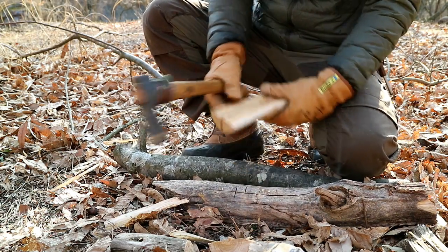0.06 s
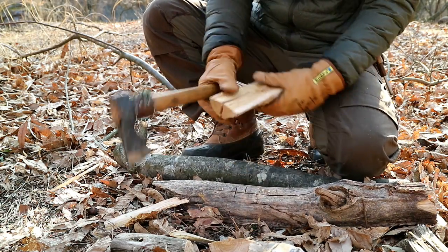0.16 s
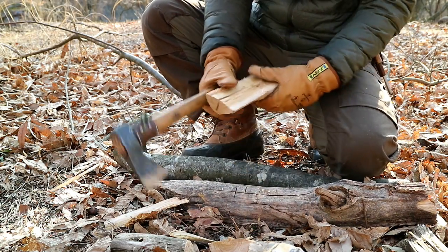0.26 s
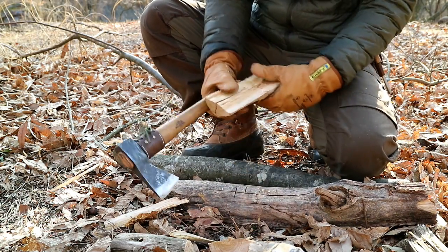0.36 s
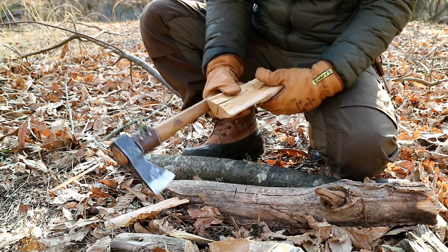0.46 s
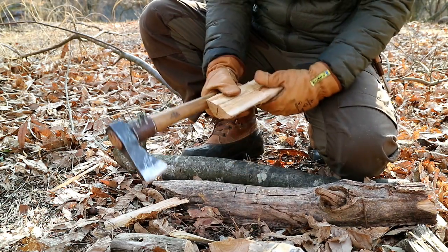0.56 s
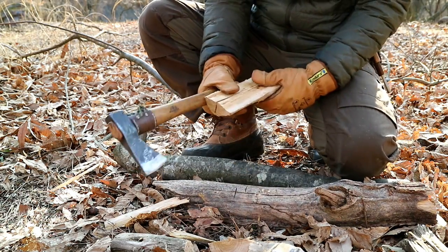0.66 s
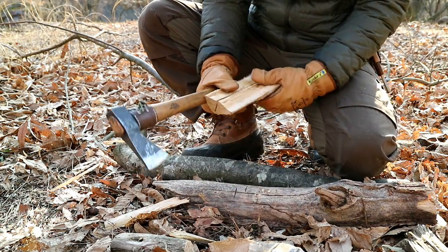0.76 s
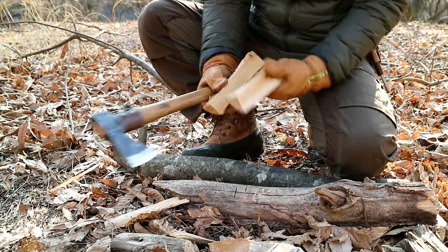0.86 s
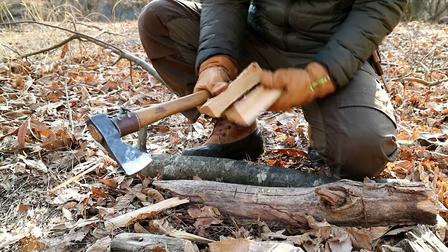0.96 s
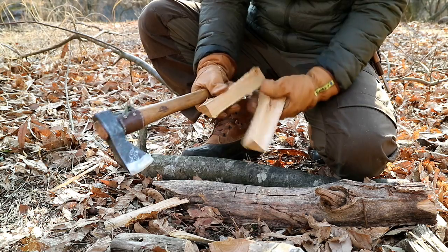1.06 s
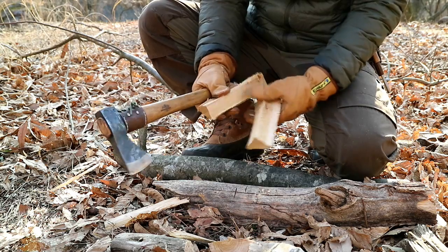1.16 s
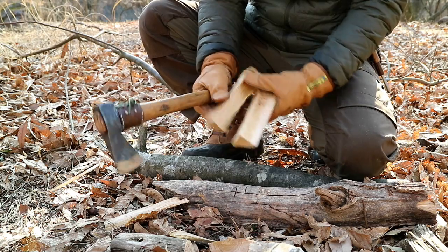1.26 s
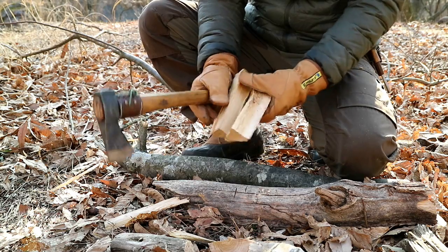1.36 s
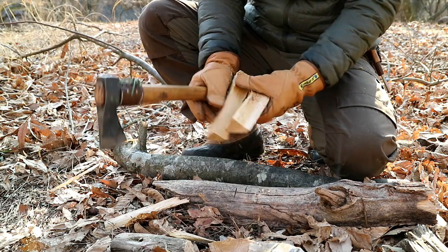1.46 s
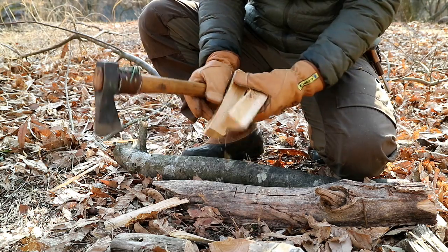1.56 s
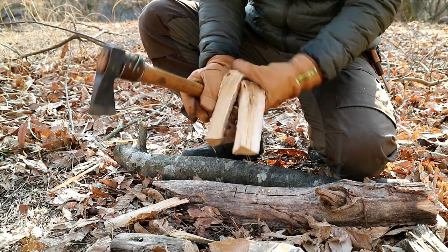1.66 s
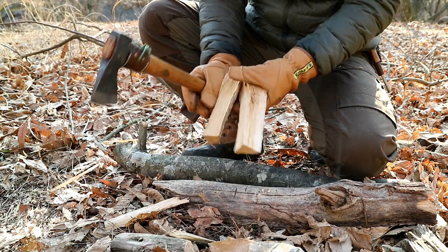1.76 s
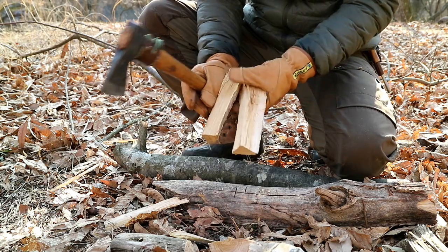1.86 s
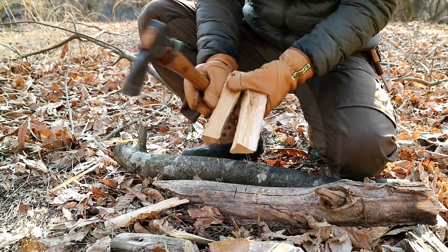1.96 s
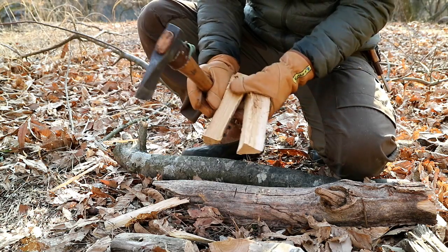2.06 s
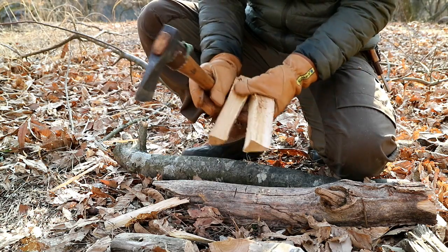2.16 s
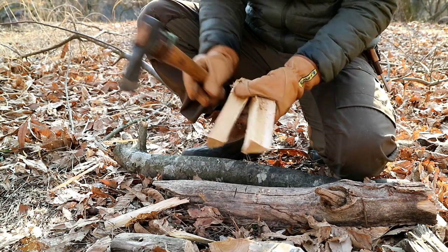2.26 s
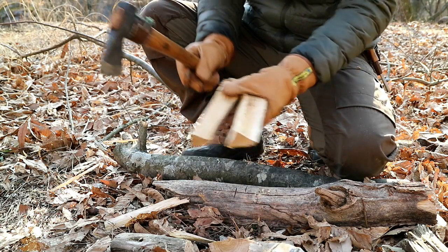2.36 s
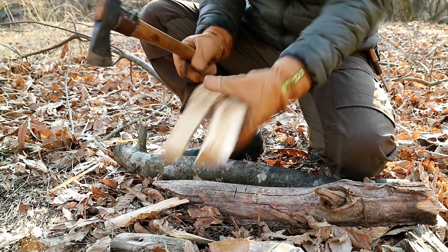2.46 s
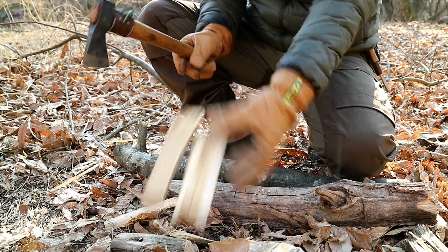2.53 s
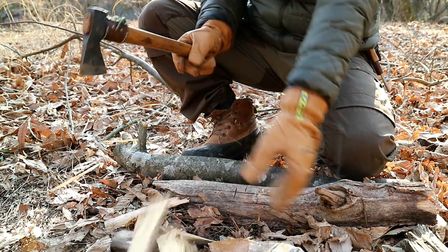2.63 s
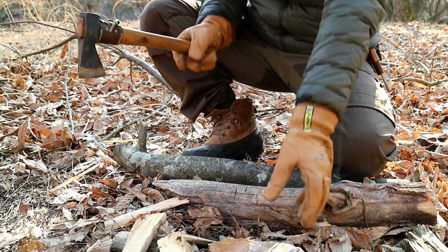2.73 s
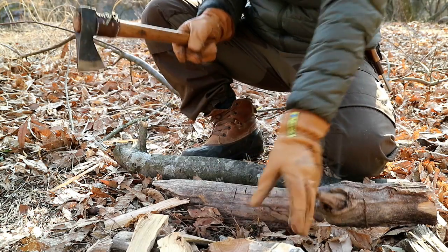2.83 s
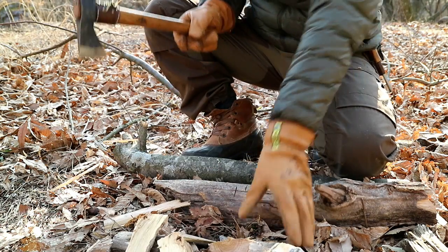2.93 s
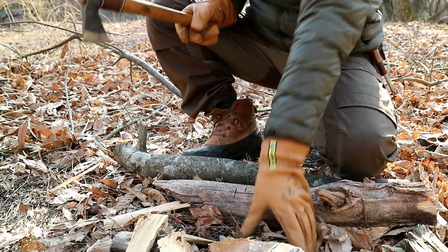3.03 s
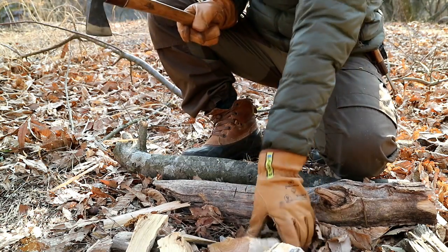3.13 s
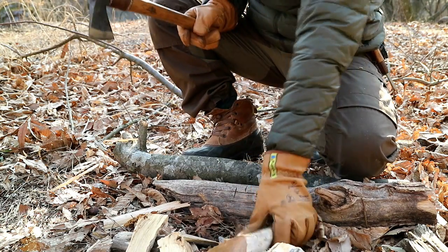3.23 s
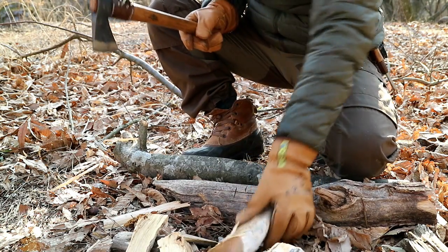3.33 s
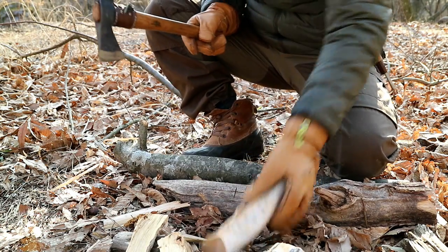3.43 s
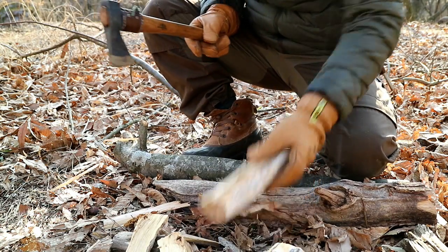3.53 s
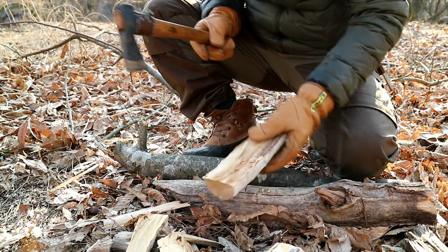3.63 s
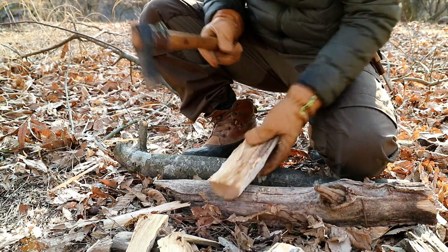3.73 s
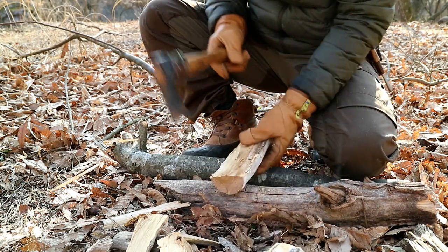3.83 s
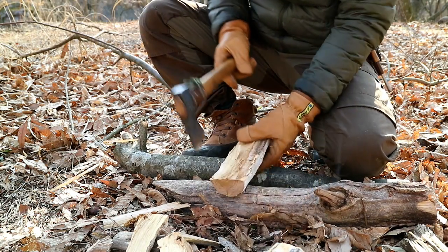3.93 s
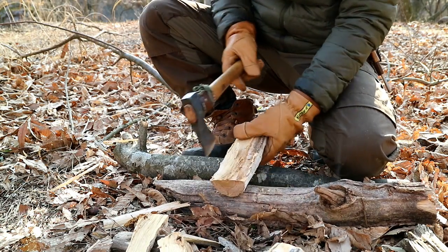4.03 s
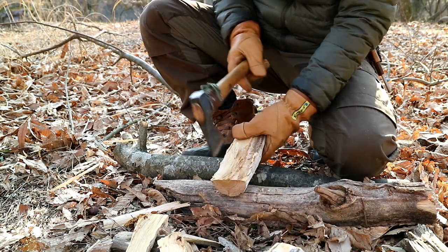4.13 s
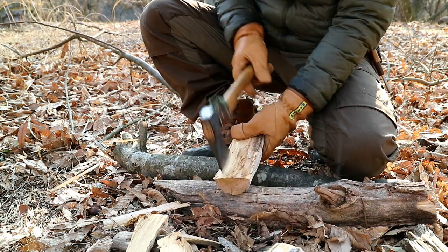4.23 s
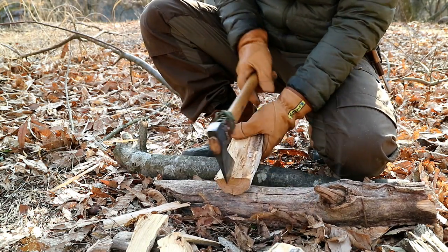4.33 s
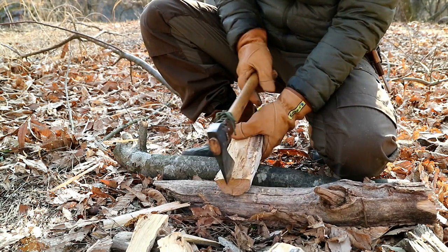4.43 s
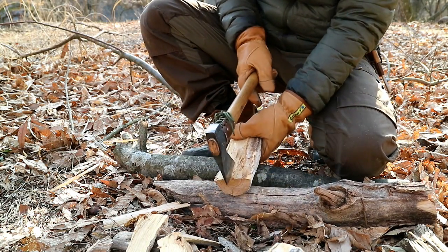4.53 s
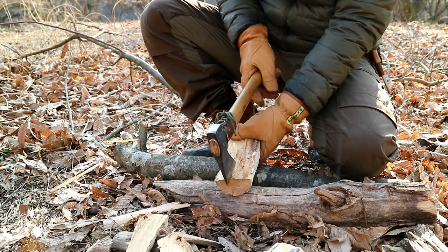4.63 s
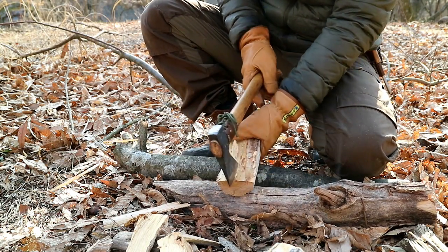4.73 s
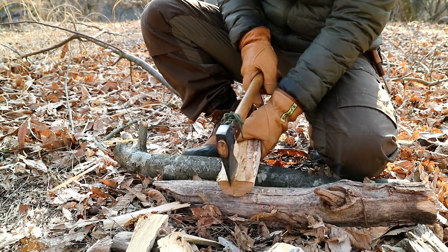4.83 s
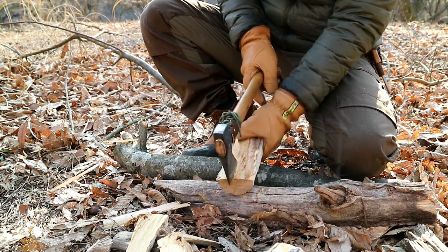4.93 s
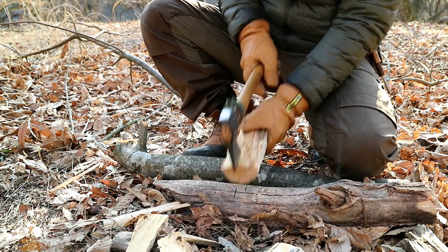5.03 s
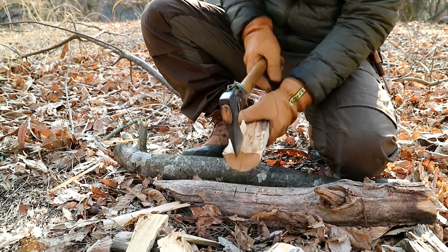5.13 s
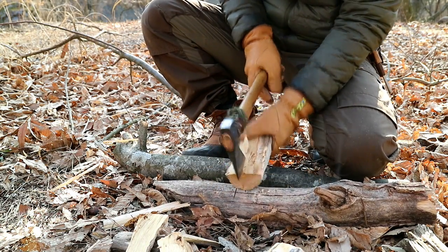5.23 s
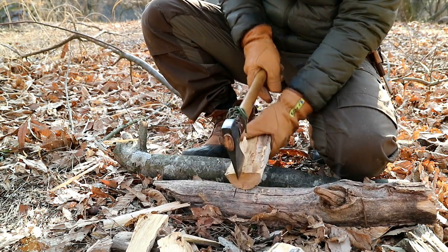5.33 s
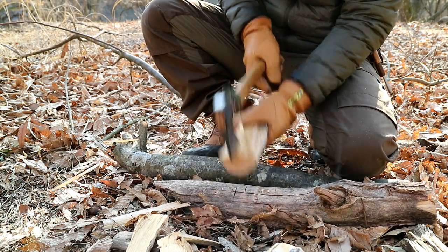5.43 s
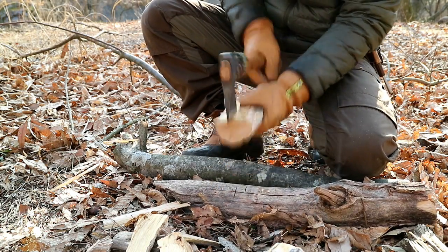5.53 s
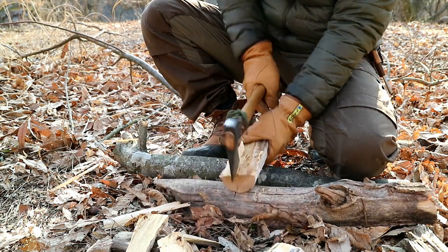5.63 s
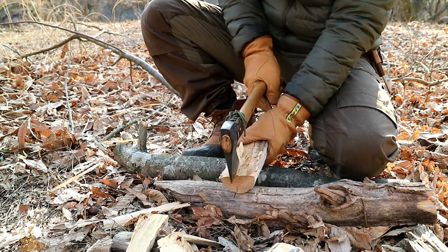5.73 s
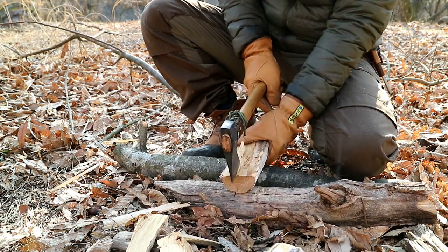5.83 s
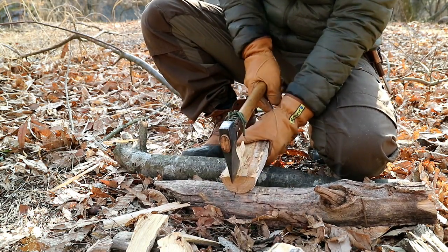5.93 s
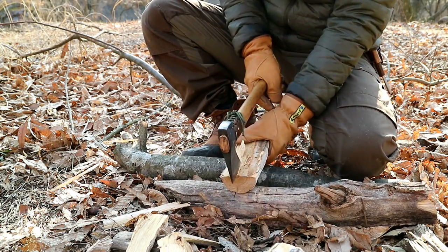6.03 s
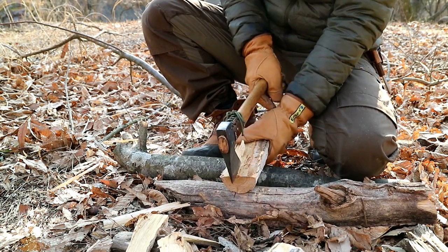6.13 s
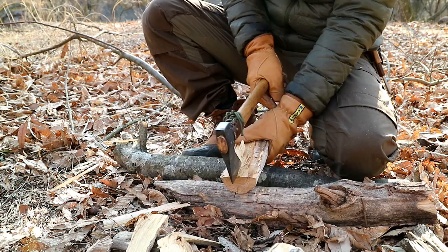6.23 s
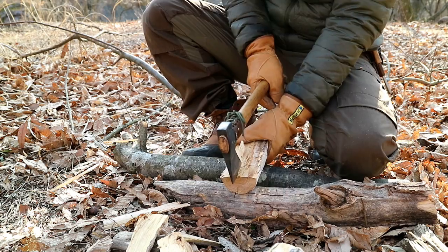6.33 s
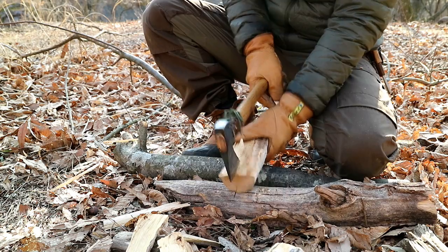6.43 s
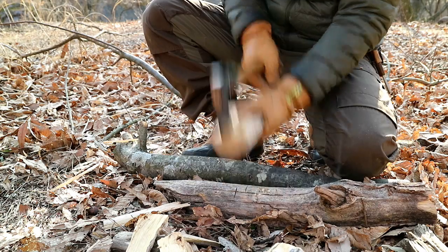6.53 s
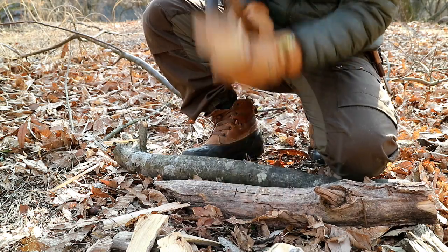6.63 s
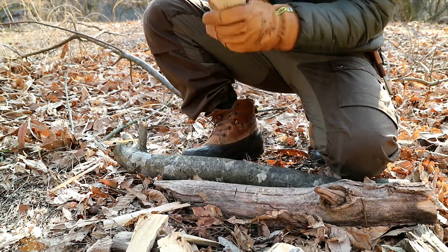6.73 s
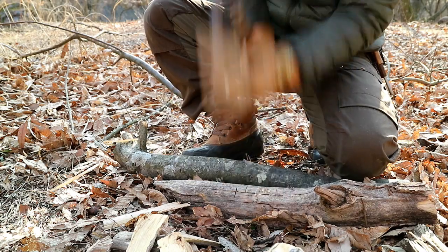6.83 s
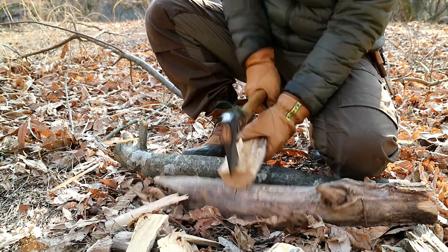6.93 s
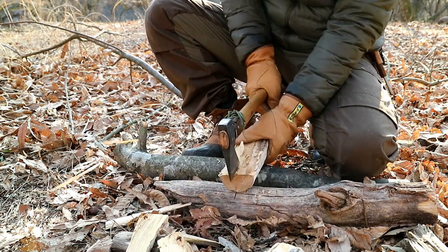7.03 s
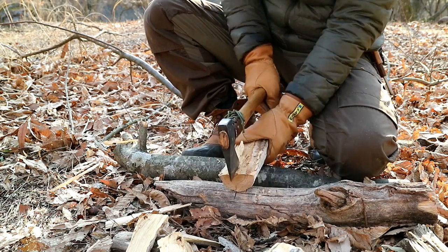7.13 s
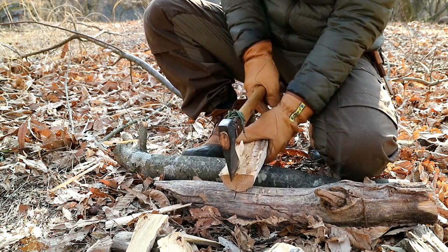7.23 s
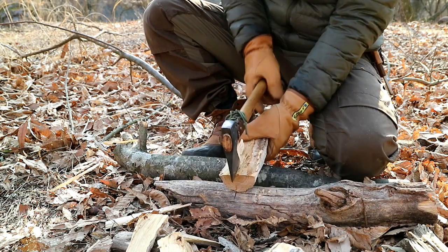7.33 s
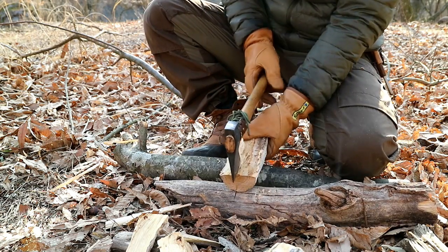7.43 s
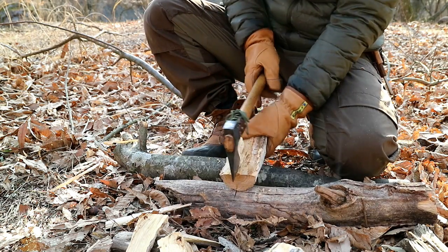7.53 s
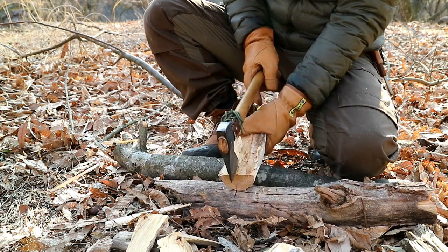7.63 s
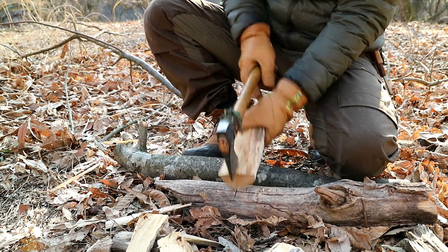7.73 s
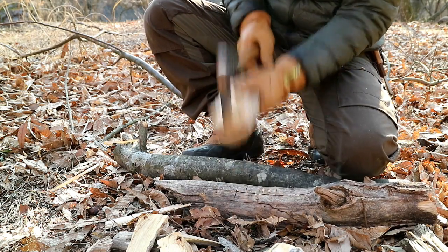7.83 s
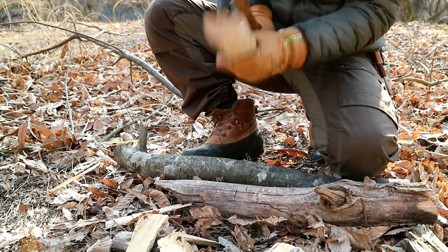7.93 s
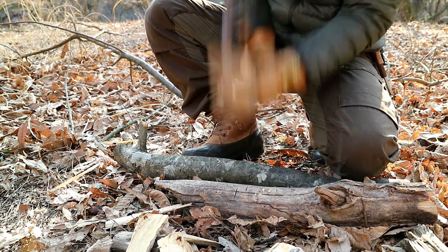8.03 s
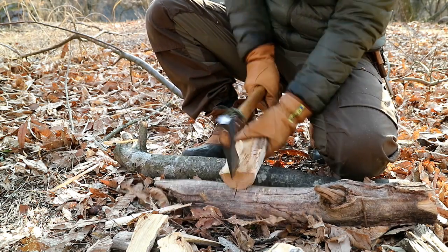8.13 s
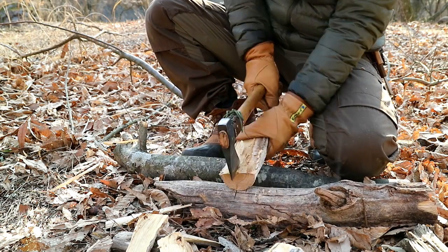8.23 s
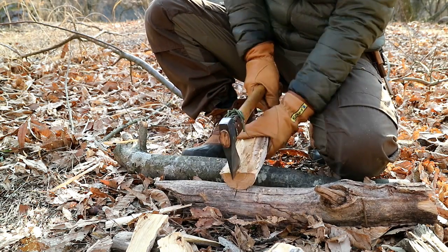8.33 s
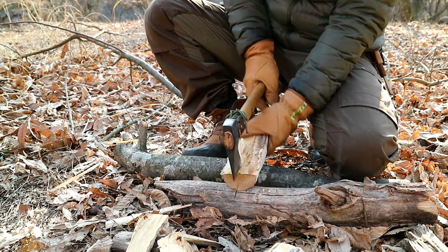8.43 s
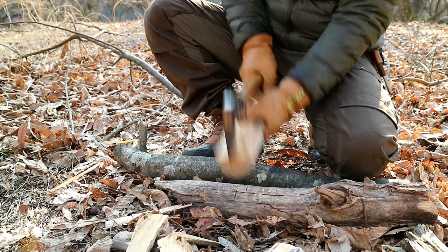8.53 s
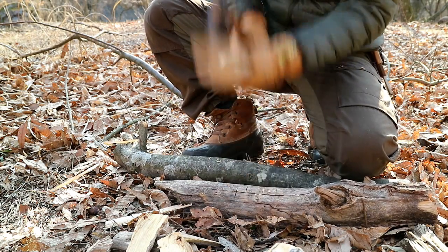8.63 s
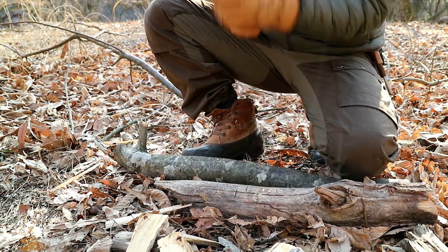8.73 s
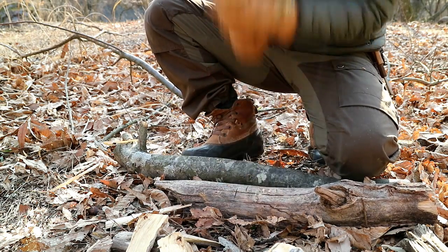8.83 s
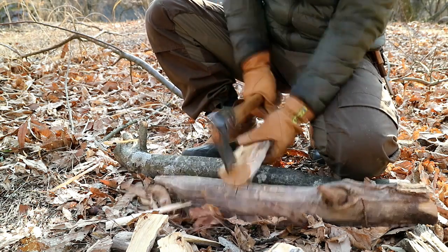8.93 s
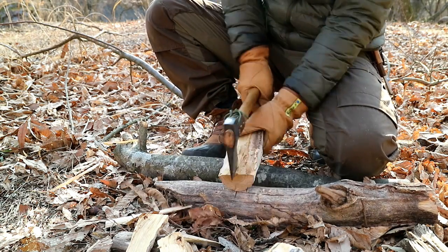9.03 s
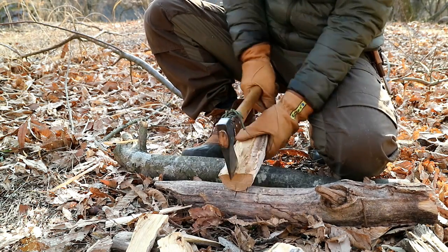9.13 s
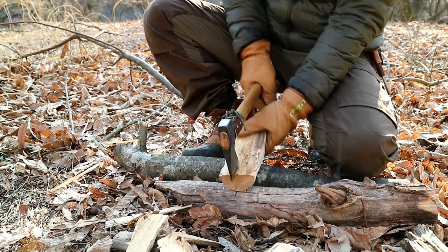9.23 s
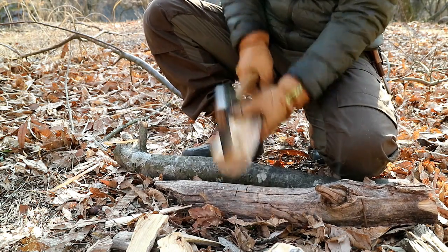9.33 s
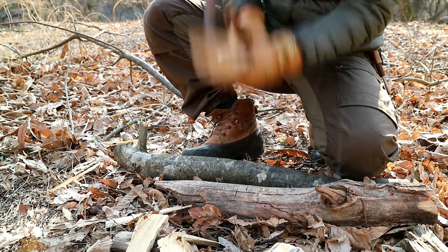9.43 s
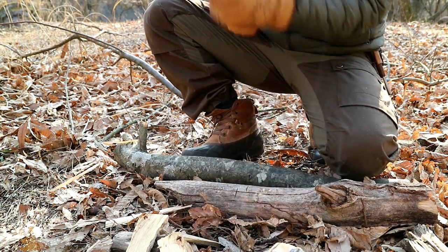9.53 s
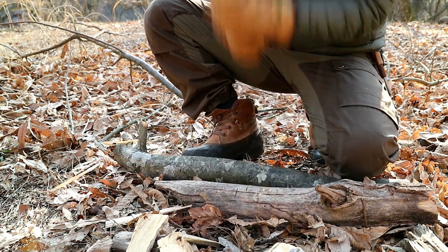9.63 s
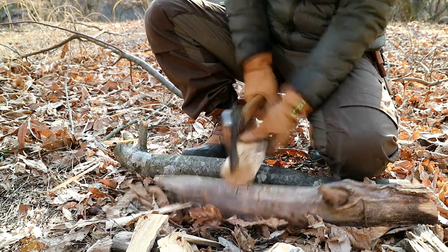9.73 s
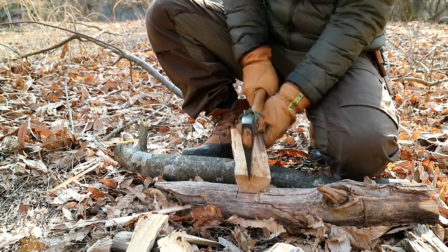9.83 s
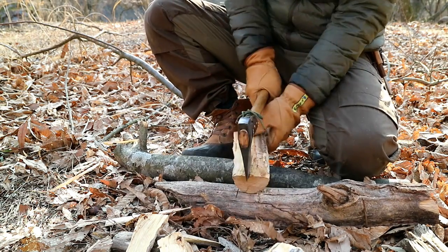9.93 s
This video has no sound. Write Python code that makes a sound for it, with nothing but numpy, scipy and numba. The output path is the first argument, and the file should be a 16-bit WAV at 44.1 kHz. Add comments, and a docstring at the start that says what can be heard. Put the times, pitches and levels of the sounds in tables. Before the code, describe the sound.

A steady, wide, airy hiss leaning slightly left fills a dry woodland space. Close by, around 0.9 to 1.0 seconds, wood fibres tear in a quick splintering crackle with a tiny knock. A leaf snaps at 1.8. At 2.75 tossed halves land with a bright, hollow clink and rapid small bounces, stirring dry leaves; faint rustling and a thin far bird peep follow near 3.2. A light tap comes at 3.9, a softer one at 4.4, and a quick weak pair at 5.2 and 5.4. Then hatchet and billet slam the log at 5.75, 7.0, 8.2, 9.1 and 9.9, the last preceded by a tiny touch. These are very short, hard woody cracks with steel edge and crunching grain, overloading the microphone. The hiss ducks after slams and creeps back. Single leaf snaps come near 7.2 and 9.35, with barely audible high whistles near 7.9 and 8.7.

```python
"""A hatchet splits kindling on a log in leafy woods: struck wood, steel and log ring, and the grain crunches.
First a stick is torn apart and its halves are tossed on the pile; bursts of noise make the breaking fibres.
Then a new billet is set down, the blade is tapped in, and both are slammed on the log five times.
Each slam overloads the microphone, whose gain ducks and creeps back.
Dry leaves crackle (sparse noise), a far bird whistles (gliding tones) and a steady hiss lies behind it all."""
import sys
import numpy as np
from scipy import signal
from scipy.fft import rfft, irfft
from scipy.io import wavfile
from scipy.ndimage import uniform_filter1d
from numba import njit

SR = 44100
rng = np.random.default_rng(int(sys.argv[2]) if len(sys.argv) > 2 else 0)


def to_wav(s):
    """Save 16-bit WAV."""
    ch = np.atleast_2d(s).T  # columns
    pcm = np.round(np.clip(ch, -1, 1) * 32767)  # PCM
    wavfile.write(sys.argv[1], SR, pcm.astype(np.int16))


N = 439677
RING_T = np.arange(SR // 2) / SR  # half a second of time, in s, for every short sound
HZ = np.fft.rfftfreq(N, 1 / SR)

# Knocks; the log, haft and blade levels are relative to the force, the pitch is for billet and crack:
# start_s, force_db, log_db, haft_db, blade_db, pitch_factor
KNOCKS = [(1.0193, -22, -34, 2, 4, 0.81), (3.8570, -9, -32, -7, -34, .92), (4.4330, -20, 1, -19, -2, 0.84),
          (5.198, -27, -25, -6.5, -8, 1), (5.3778, -7, -4.5, -30, -26, 0.9),
          (5.751, 13, -18.5, -14, -29, 0.98), (7.0297, 18.5, -3.5, -30, -24.5, 1.02),
          (8.2317, 17, -5, -13, -15, 1), (9.0717, 21.5, -1, -3, -15, 1.02),
          (9.800, -26.5, -18, -14, -14, 0.59), (9.8737, 19, -5.5, -2, 1.5, .99)]
# Ringing tones of the struck parts, each list: pitch_hz, level_db, t60_s (time to fade by 60 dB)
BILLET = [(881, 1, 0.029), (925.3, -12.5, 0.063)]
BARK = [(586, -8.5, 0.04), (704, 3, 0.013)]
CRACK = [(1209.6, 1, 0.022), (1369, 4, 0.007)]
HAFT = [(1831, -2, 0.035), (1890, -31, 0.17)]
BLADE = [(2407, -7, 0.0093), (3395, -2, 0.015)]
LOG = [(270, 2, 0.0037), (383, -1, 0.016)]
# A harder blow is a brighter one: level_db at a force of 0 dB (against the billet), gain_db per dB of force
BARK_LAW = (-3, -0.23)
CRACK_LAW = (-6.5, 0.53)
BITE_DB = -15  # crunch of the edge, against the force
GRAIN_GIVES_DB, BITE_GROWTH = 12, 1.53  # past this force the grain gives way: extra dB of crunch per dB
CONTACT_S, CONTACT_STIFFENING = 0.0002, 0.52  # ring build-up at 0 dB; shorter by this power of the force
KNOCK_PAN_DB = 1  # left over right: every blow lands on the same spot
# Tone colour of the ground's rumble: pitch_hz, level_db
SOIL_SPECTRUM = [(25, -22.5), (55, -10), (85, 4.5), (110, -10.5), (145, -9), (220, -14), (400, -41.5),
                 (1000, -79)]
SOIL_DB, LINGER_S = -34, 0.12  # jolt of the ground against the force; fading time of its faint rest

# Tossed halves landing: start_s, level_db, pitch_factor of the half, half_ring_db
LANDINGS = [(2.758, -0.5, 0.95, 7), (2.768, -18.5, 0.55, -14), (2.7795, -11, 0.84, 0),
            (2.7825, -16, .887, 7), (2.8015, -20, 0.76, -6)]
# Ringing tones of the pile, and of a loose half: pitch_hz, level_db, t60_s
PILE = [(636, -3, 0.023), (942, 6, 0.025), (1193, 3, 0.024), (1370, -5.5, 0.013), (4230, 3.5, 0.0059),
        (5070, -31, 0.0036)]
HALF = [(2470, 1, 0.042), (2200, -26, 0.026), (3000, -13, .02)]

# Fibres tearing, before a shared lift in tearing(): start_s, level_db, fade_s, woody_share (0 to 1)
TEARS = [(0.912, -27.5, 0.0065, 0), (0.915, -9, 0.0015, 1), (0.9243, -11.5, 0.0064, 0.94),
         (1.0208, -7.5, 0.00077, 0.58)]
# Ringing tones of the thin stick: pitch_hz, level_db, t60_s
FIBRE = [(1860, -8.5, 0.012), (3245, 0, 0.021), (3720, 7, 0.0041), (5300, -4, 0.0036)]
# Tone colour of breaking wood: pitch_hz, level_db
SNAP_SPECTRUM = [(100, -22.5), (600, 0), (2000, 6.5), (6000, 1.5), (9000, 3), (12500, -21), (16000, -26.5)]
SPLINTER_DB, SPLINTER_S = -34, 0.038  # last splinters after a woody tear: level, fading time

# Single dry leaves snapping: start_s, level_db
LEAF_SNAPS = [(1.762, -32), (2.551, -28), (3.258, -36), (3.419, -26), (7.167, -25.5), (9.349, -21.5),
              (9.9455, -37)]
# The landing halves stir the leaves, then the hand that picks up a billet: start_s, length_s, level_db
STIRS = [(2.744, 0.11, -27), (2.997, 0.078, -45), (3.185, 0.33, -40.5)]
# Tone colour of dry leaves: pitch_hz, level_db
LEAF_SPECTRUM = [(200, -9.5), (1200, -12), (3500, 10), (7500, 5), (11000, -9.5), (16000, -20)]
LEAF_SNAP_S, STIR_ATTACK_S = 0.005, 0.026  # fading time of a snap, rise of a stir
SHIFTING_DB = -57.5  # the boot shifts in the leaves all the while

# Thin calls of a far bird, before panning: start_s, length_s, start_hz, end_hz, level_db
BIRD = [(3.189, 0.045, 7700, 7230, -35), (3.39, 0.22, 7550, 7250, -51.5), (7.94, .07, 7900, 7450, -42),
        (8.72, 0.049, 7850, 7900, -44)]

# Tone colour of the hiss: pitch_hz, level_db (per Hz, before the whole is set to HISS_DB)
HISS_SPECTRUM = [(18, -61.5), (30, -23), (48, -22), (295, -8.5), (374, -9.5), (526, -6.5), (569, -6.5),
                 (844, -1), (1160, 0), (1430, -0.5), (2170, -5.5), (4300, -9), (9710, -22.5),
                 (14800, -26.5), (16000, -27)]
# Width of the hiss: pitch_hz, side_over_mid_db
HISS_SIDE = [(60, 5.5), (110, 11.5), (200, 13.5), (380, 9), (700, 5.5), (1290, 2), (2380, 1), (4400, -1.5),
             (8120, -1.5), (15000, -4.5)]
# Balance of the hiss: pitch_hz, left_over_right_db
HISS_LEAN = [(60, -2), (110, -2), (200, 2), (380, 1), (700, 1.5), (1290, 4), (2380, 5.5), (4400, 2.5),
             (8120, 1.5), (15000, -0.5)]
HISS_DB = -37.5

# Bounce off the ground, left row then right row: delay_s, strength (a plain factor)
GROUND = [(.0033, 0.21), (.0045, 0.4)]
# How long the woods echo: pitch_hz, t60_s
WOODS = [(80, 0.27), (400, 0.23), (1200, 0.29), (4000, 0.55), (12000, 0.29)]
# Tone colour of that echo: pitch_hz, level_db
SCATTER = [(100, 9.5), (500, -11.5), (900, 3), (1300, -6), (2200, -5.5), (3400, -5.5), (12000, -2.5)]
EDGE_HZ = 16100  # upper band limit of the recorder


def knocks(bite_s=0.0025, corner_hz=260, log_lag_s=0.0032):
    """Billet and hatchet ring while the edge crunches into the grain; the heavy log and the ground follow."""
    out = np.zeros((2, N))
    pan = amp([[KNOCK_PAN_DB / 2], [-KNOCK_PAN_DB / 2]])
    for s, force_db, log_db, haft_db, blade_db, pitch in KNOCKS:
        bark_db, crack_db = (db + slope * force_db for db, slope in (BARK_LAW, CRACK_LAW))
        wood = ring(BILLET, pitch) + amp(bark_db) * ring(BARK) + amp(crack_db) * ring(CRACK, pitch)
        hatchet = amp(haft_db) * ring(HAFT) + amp(blade_db) * ring(BLADE)

        bite_db = BITE_DB + BITE_GROWTH * max(force_db - GRAIN_GIVES_DB, 0)
        crunch = coloured(grains(len(RING_T), 2), SNAP_SPECTRUM)[0]
        bite = amp(bite_db) * burst(bite_s) * crunch

        contact_s = CONTACT_S * amp(-CONTACT_STIFFENING * force_db)
        pressed = 1 - np.exp(-RING_T / contact_s)
        strike = radiated(pressed * (wood + hatchet), corner_hz) + bite
        add(out, s, amp(force_db) * pan * strike)

        log = amp(log_db) * radiated(ring(LOG), corner_hz)
        add(out, s + log_lag_s, amp(force_db) * (log + amp(SOIL_DB) * rumble()))
    return out


def rumble(fade_s=0.012, linger_db=-21, side_db=8):
    """The jolted ground shakes briefly, and a faint, wide rumble lingers."""
    shake = burst(fade_s, 0.005) + amp(linger_db) * burst(LINGER_S, 0.02)
    mid, side = coloured(rng.standard_normal((2, len(RING_T))), SOIL_SPECTRUM) * shake
    side = amp(side_db) * side
    return np.array([mid + side, mid - side]) / np.sqrt(2)


def landings(tick_db=-18, tick_s=0.0045, corner_hz=450, contact_s=0.00093):
    """The loose halves clink on the pile and bounce; the ringing builds up over the contact time."""
    out = np.zeros((2, N))
    pressed = 1 - np.exp(-(RING_T / contact_s) ** 2)
    for s, db, pitch, ring_db in LANDINGS:
        tick = amp(tick_db) * burst(tick_s) * coloured(grains(len(RING_T), 1.4), SNAP_SPECTRUM)
        clink = pressed * (ring(PILE) + amp(ring_db) * ring(HALF, pitch))
        add(out, s, amp(db) * radiated(clink + tick, corner_hz))
    return out


def tearing(level_db=8, corner_hz=700):
    """Fibres break in bursts; in woody tears they also ring the thin stick, and splinters trail after."""
    out = np.zeros((2, N))
    for s, db, fade_s, woody in TEARS:
        woody = np.clip(woody, 0, 1)
        breaks = grains(len(RING_T), 1.43)
        body = ring(FIBRE)
        # each small break sets the stick ringing anew
        rung = signal.fftconvolve(breaks[0] * burst(fade_s), body / np.linalg.norm(body))[:len(RING_T)]
        splinters = amp(SPLINTER_DB) * burst(SPLINTER_S)
        snap = coloured(breaks, SNAP_SPECTRUM) * ((1 - woody) * burst(fade_s) + woody * splinters)
        add(out, s, amp(db + level_db) * radiated(woody * rung + snap, corner_hz))
    return out


def leaves():
    """Dry leaves crackle under hand and boot, each stir swelling and dying away; a few snap singly."""
    stir, snaps = np.full(N, amp(SHIFTING_DB)), np.zeros(N)
    for s, length, db in STIRS:
        t = np.arange(0, length, 1 / SR)
        add(stir, s, amp(db) * np.minimum(t / STIR_ATTACK_S, 1) * (1 - t / length))
    for s, db in LEAF_SNAPS:
        add(snaps, s, amp(db) * burst(LEAF_SNAP_S))
    crackle = grains(N, 4.1) * (rng.random(N) < 3000 / SR)  # about 3000 crackles a second
    return stir * coloured(crackle, LEAF_SPECTRUM) + snaps * coloured(grains(N, 2.5), LEAF_SPECTRUM)


def bird(waver_hz=90):
    """Faint whistles: gliding tones whose pitch wavers at random."""
    out = np.zeros((2, N))
    pan = amp([[2], [-3]])  # left and right, dB
    for s, length, start_hz, end_hz, db in BIRD:
        size = int(length * SR)
        waver = evened(uniform_filter1d(rng.standard_normal(size), size=100))
        hz = np.linspace(start_hz, end_hz, size) + waver_hz * waver
        whistle = np.hanning(size) * np.sin(2 * np.pi * np.cumsum(hz) / SR)
        add(out, s, amp(db) * whistle * pan)
    return out


def hiss(patchy_db=1.24, swell_db=-0.71):
    """A wide, even rush from far off to the left: shaped noise with faint drifting patches."""
    frames, hz = N // 512 + 5, np.fft.rfftfreq(2048, 1 / SR)
    a, b, c, d, patches = rng.standard_normal((frames, len(hz), 5)).T
    patches = uniform_filter1d(patches, size=24, axis=0)  # smooth over pitch
    patches = evened(uniform_filter1d(patches, size=8, axis=1))  # then over time
    swell = evened(uniform_filter1d(rng.standard_normal(frames), size=25))
    field = amp(read(HISS_SPECTRUM, hz)[:, None] + patchy_db * patches + swell_db * swell)

    mid = field * (a + 1j * b)
    side = field * (c + 1j * d) * amp(read(HISS_SIDE, hz))[:, None]
    lean = amp(read(HISS_LEAN, hz) / 2)[:, None]
    both = np.array([(mid + side) * lean, (mid - side) / lean])
    pair = signal.istft(both, nperseg=2048, noverlap=1536)[1][:, :N]
    return amp(HISS_DB) * pair / pair.mean(0).std()


def outdoors(x, woods_db=-25):
    """Sound bounces off the ground and scatters faintly among the trunks."""
    bounce = np.array([strength * delayed(side, s) for side, (s, strength) in zip(x, GROUND)])
    # sparse random echoes, fading at a rate that depends on pitch
    echoes = rng.standard_normal((2, SR)) * (rng.random((2, SR)) < 2000 / SR)
    hz, t, z = signal.stft(echoes, SR, nperseg=256)
    fading_db = read(SCATTER, hz)[:, None] - 60 * t / read(WOODS, hz)[:, None]
    tail = signal.istft(z * amp(fading_db), SR, nperseg=256)[1]
    scattered = signal.fftconvolve(x, tail / np.linalg.norm(tail[0]), axes=1)[:, :N]
    return x + bounce + amp(woods_db) * scattered


def ring(modes, pitch=1):
    """Free ringing of a struck body: a sum of fading tones."""
    return sum(amp(db - 60 * RING_T / t60) * np.sin(2 * np.pi * hz * pitch * RING_T)
               for hz, db, t60 in modes)


def grains(size, spread_db):
    """Dense micro-fractures of uneven strength, for two channels."""
    strength_db = spread_db * np.minimum(rng.exponential(1, (2, size)), 5)
    return evened(rng.standard_normal((2, size)) * amp(strength_db))


def burst(fade_s, rise_s=0.00083):
    """Quick rise and exponential fall."""
    return (1 - np.exp(-RING_T / rise_s)) * np.exp(-RING_T / fade_s)


def radiated(x, corner_hz):
    """A small body pushes little air at low frequencies."""
    return signal.sosfilt(signal.butter(2, corner_hz, "high", fs=SR, output="sos"), x)


def coloured(x, spectrum):
    """Gives noise a spectrum, at rms (average strength) 1."""
    size = x.shape[-1]
    gain = amp(read(spectrum, np.fft.rfftfreq(size, 1 / SR)))
    return evened(irfft(rfft(x) * gain, size))


def delayed(x, s):
    """Delays a whole track by s seconds."""
    return irfft(rfft(x) * np.exp(-2j * np.pi * HZ * s), N)


def amp(db):
    """Decibels to gain."""
    return 10 ** (np.asarray(db) / 20)


def evened(x):
    """Scales to rms 1."""
    return x / np.sqrt(np.mean(x ** 2) + 1e-20)


def read(points, hz):
    """Reads a table on a log-frequency axis."""
    f, value = np.transpose(points)
    return np.interp(np.log(hz + 1), np.log(f + 1), value)


def add(mix, s, sound):
    """Mixes a sound in at time s."""
    part = mix[..., round(s * SR):][..., :sound.shape[-1]]
    part += sound[..., :part.shape[-1]]


def scene(lag_s=0.00005):
    """The woodwork close by, the woods around it; everything reaches the left port a little sooner."""
    woodwork = outdoors(knocks() + landings() + tearing())
    left, right = woodwork + leaves() + bird() + hiss()
    return np.array([left, delayed(right, lag_s)])


@njit
def ducking(level_db, start_db, limit_db, fall, recovery):
    """Gain in dB: falls while the output is over the limit, then creeps back (both in dB a second)."""
    gain, out = start_db, np.zeros(len(level_db))
    for i in range(len(level_db)):
        over = min(max((level_db[i] + gain - limit_db) / 3, 0.), 1.)  # full fall from 3 dB over
        gain = min(gain + (recovery - fall * over) / SR, 0.)
        out[i] = gain
    return out


def record(dry, start_db=-16.5, limit_db=-1, fall_db=2400, recovery_db=10.0):
    """Gain control, already low at the start, is too slow for the slams and they clip; then the band limit."""
    level_db = 20 * np.log10(abs(signal.hilbert(dry)).max(0) + 1e-9)
    gain_db = ducking(level_db, float(start_db), float(limit_db), float(fall_db), float(recovery_db))
    clipped = np.clip(dry * amp(gain_db), -1, 1)
    band_limit = signal.firwin(511, EDGE_HZ, window=("kaiser", 8), fs=SR)
    return signal.oaconvolve(clipped, band_limit[None], "same")


dry = scene()
out = record(dry)
to_wav(out)
```